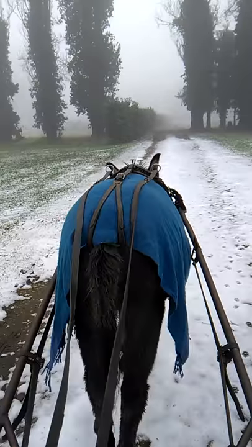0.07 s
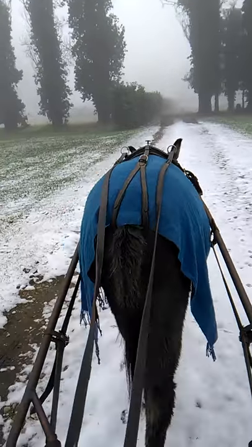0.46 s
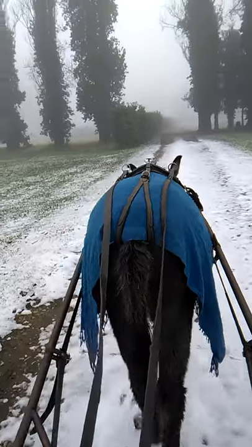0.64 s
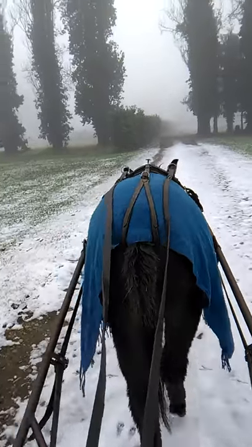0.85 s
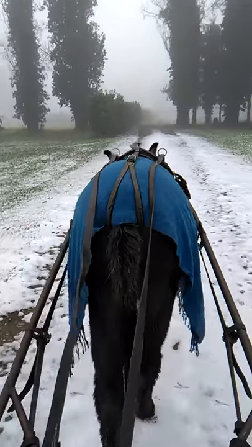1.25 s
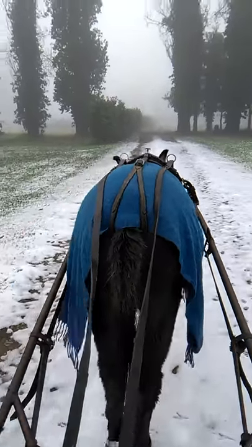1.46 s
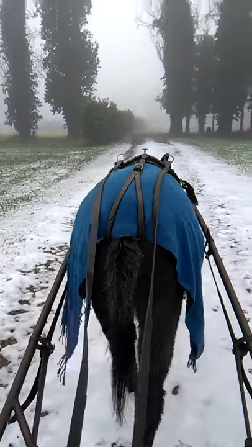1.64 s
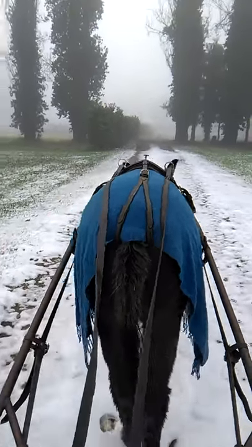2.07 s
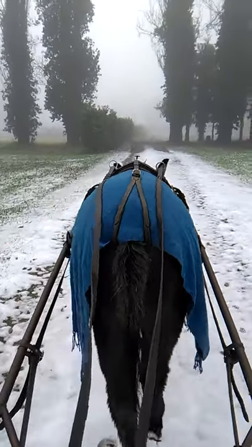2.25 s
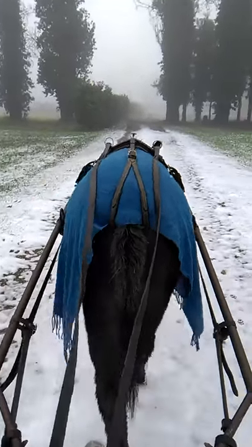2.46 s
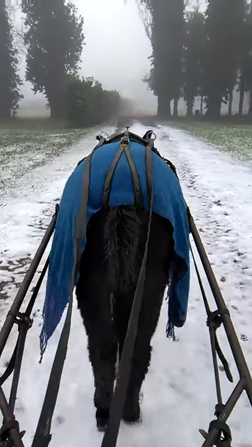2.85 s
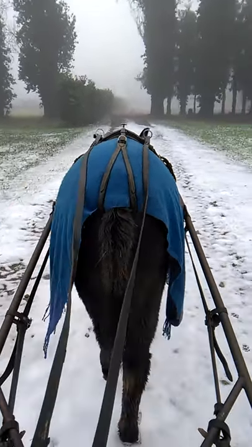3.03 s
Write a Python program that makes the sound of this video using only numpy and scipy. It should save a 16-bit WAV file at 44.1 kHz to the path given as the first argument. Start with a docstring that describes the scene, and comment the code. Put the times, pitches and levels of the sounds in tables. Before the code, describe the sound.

Cart wheels crunch and rumble along a snowy track, heard close in open air with soft hoof scuffs. One sharp drip comes early, followed by hollow bumps and shaft knocks, then quieter rolling with light harness clinks.

```python
"""A horse draws a light cart along a snowy track, heard from the driver's seat.
From 0.2 s the cart rumbles, its wheels crush snow crystals and hooves scuff the surface.
At 0.4 s a drop snaps close by. From 0.85 s the body thuds over bumps, then the shafts knock.
From 1.8 s the roll is softer and a harness buckle clinks five times.
Near 2.75 s the roll dips briefly; one faint knock follows."""
import sys
import numpy as np
from scipy import signal
from scipy.fft import rfft, irfft
from scipy.io import wavfile

SR = 44100
rng = np.random.default_rng(int(sys.argv[2]) if len(sys.argv) > 2 else 0)


def pcm_store(signal):
    """Save signal as 16-bit PCM."""
    levels = np.round(np.clip(np.atleast_2d(signal), -1, 1) * 32767)
    wavfile.write(sys.argv[1], SR, levels.astype(np.int16).T)


N = 136710
TIME = np.arange(N) / SR
EVENT_TIME = TIME[:SR // 6]

# Roll. Each row: time in seconds, rumble in dB, drive of grind and crunch in dB, fizz in dB.
ROLL_LEVELS = [(.2, -51.5, -56, -62.5), (.42, -47.5, -56, -65), (.8, -50.5, -57.5, -66.5),
               (1.0, -44, -56, -67), (1.14, -51.5, -57, -69.5), (1.38, -46.5, -57.5, -70),
               (1.622, -51, -55.5, -68.5), (1.8, -58.5, -63, -64), (1.99, -59, -65.5, -69.5),
               (2.13, -55.5, -62, -63), (2.26, -58, -64.5, -69.5), (2.42, -53, -62.5, -67),
               (2.66, -58, -64.5, -70), (2.72, -69, -70, -75.5), (2.765, -74, -71, -74),
               (2.80, -57.5, -65, -67.5), (3.1, -59.5, -66.5, -71.5)]
# Cart rumble. Each row: frequency in Hz, relative density in dB.
RUMBLE_SPECTRUM = [(22, -45), (48, -10), (67, 0.5), (90, -4), (120, -5), (175, -13.5), (290, -20.5),
                   (450, -26), (2000, -73.5)]
# Packed snow grinding. Each row: frequency in Hz, relative density in dB.
GRIND_SPECTRUM = [(120, -16.5), (290, 2), (510, -5.5), (620, 4), (780, 1), (1000, 1.5), (1400, -9),
                  (2500, -13), (6000, -46.5)]
# Bright wheel crunch. Each row: frequency in Hz, relative density in dB.
CRUNCH_SPECTRUM = [(600, -14.5), (1500, 3), (2400, 2), (4300, -2), (4850, -5.5), (5600, -2.5), (7000, -6),
                   (10000, -20.5), (14500, -30.5)]
# Treble fizz. Each row: frequency in Hz, relative density in dB.
FIZZ_SPECTRUM = [(2000, -41), (5600, -13.5), (7000, -2.5), (8400, 2.5), (10000, -1), (11500, -4),
                 (14500, -10.5)]
# Stereo width of snow. Each row: frequency in Hz, side against middle in dB.
SNOW_WIDTH = [(3000, -78), (4500, -30), (6500, -7), (13000, -5)]

# Hoof scuffs. Each row: start in seconds, length in seconds, hiss in dB, crush in dB.
HOOF_SCUFFS = [(0.307, 0.074, -53.5, -51.5), (0.553, 0.045, -57.5, -65), (1.015, 0.053, -51.5, -54.5),
               (1.259, 0.068, -59.5, -56), (1.556, 0.058, -48.5, -56.5), (1.783, 0.074, -59, -61.5),
               (2.486, 0.057, -54.5, -56.5)]
# Brushed snow, also the buckle's snap. Each row: frequency in Hz, relative density in dB.
HISS_SPECTRUM = [(2000, -18), (5000, -12.5), (7000, -7.5), (9700, -1.5), (11000, -9.5), (14500, -19)]
# Snow crushed under a hoof. Each row: frequency in Hz, relative density in dB.
CRUSH_SPECTRUM = [(250, -6), (800, -8.5), (1800, -0.5), (4500, -4), (7000, -9.5), (12000, -16.5)]

# Knocks. Each row: start in seconds, ring gain in dB, tilt in dB per octave, pitch factor, crack in dB.
SHAFT_KNOCKS = [(.955, -35.5, 0.1, 1, -41.5), (1.3152, -34.5, -2, 0.97, -47), (1.863, -49, -3, 0.95, -58.5),
                (2.505, -43.5, -2.5, 0.99, -50.5), (2.98, -49, -3, 0.96, -63)]
# Shaft resonances. Each row: frequency in Hz, relative level in dB, T60 in seconds.
SHAFT_MODES = [(795, -0.5, 0.038), (963, -4.5, 0.027), (1220, -12.5, 0.071), (1600, -8, 0.016),
               (2176, -17.5, 0.028), (2986, -7, 0.057), (3570, -4, 0.023), (4400, -7, 0.014),
               (5470, -17.5, 0.081), (8620, -14, 0.039)]
# Impact crack. Each row: frequency in Hz, relative density in dB.
CRACK_SPECTRUM = [(400, -4.5), (900, 4.5), (1800, 1), (5800, -2), (14000, -11.5)]

# Thuds, hard ones with a rebound. Each row: start in seconds, gain in dB, pitch factor.
BODY_THUDS = [(0.8514, -36, 0.96), (0.856, -42.5, 1.03), (1.535, -48, 0.71), (2.104, -52, 0.747),
              (2.126, -49.5, .8), (2.149, -50.5, 0.796), (2.3698, -36, 0.99), (2.3741, -43.5, 1.05)]
# Cart body resonances. Each row: frequency in Hz, relative level in dB, T60 in seconds.
BODY_MODES = [(206, -1, 0.027), (333, 0.5, 0.045), (468, -4.5, 0.033), (646, -7, 0.075), (934, -3.5, 0.026),
              (1400, -15, 0.061)]
# Low puff of a thud. Each row: frequency in Hz, relative density in dB.
PUFF_SPECTRUM = [(60, 16), (160, 19), (600, -10), (3000, -32)]

# Ring after the drop. Each row: frequency in Hz, level in dB, T60 in seconds.
DROP_RING_MODES = [(150, -42, .05), (4020, -39.5, .022)]

# Clinks. Each row: start in seconds, gain in dB, tilt in dB per octave, pitch factor.
BUCKLE_CLINKS = [(1.822, -52.5, -3, 1.36), (2.032, -56.5, 1.5, .8), (2.102, -49.5, -6, 1.17),
                 (2.112, -50.5, 1.5, 1), (2.312, -56, -7, 1.4)]
# Buckle resonances. Each row: frequency in Hz, relative level in dB, T60 in seconds.
BUCKLE_MODES = [(2077, -2.5, 0.058), (2300, -3, 0.015), (3370, -9, 0.063), (7850, -3, 0.016),
                (8140, -6, 0.078), (8300, -6, .03)]

MODE_RISE_S, CRACK_RISE_S = .00066, .0005


def wheels(firm_db=-56, lump_db=.5, lump_hz=30, crunch_db_per_db=1.474):
    """The cart rumbles as its wheels crush snow in lumps; crunch eases faster than grind."""
    times_s, *levels_db = np.transpose(ROLL_LEVELS)
    rumble_db, drive_db, fizz_db = (np.interp(TIME, times_s, db) for db in levels_db)
    over_firm_db = drive_db - firm_db + lump_db * wander(lump_hz)
    rumble = unit(colour(rng.standard_normal(N), RUMBLE_SPECTRUM)) * amp(rumble_db)
    grind = snow(GRIND_SPECTRUM, N) * amp(firm_db - 2.5 + over_firm_db)
    crunch = snow(CRUNCH_SPECTRUM, N) * amp(firm_db - 3.5 + crunch_db_per_db * over_firm_db)
    fizz = snow(FIZZ_SPECTRUM, N) * amp(fizz_db)
    return rumble + grind + crunch + fizz


def snow(spectrum, size, grains_per_s=2500, spread_db=2, grain_share=.31):
    """Crystals break: uneven clicks in a hiss, wide only in the treble."""
    shape = (2, size)
    breaks = rng.random(shape) < grains_per_s / SR
    signs = rng.choice([-1, 1], shape)
    grains = unit(breaks * signs * amp(spread_db * np.minimum(rng.exponential(1, shape), 4)))
    texture = np.sqrt(grain_share) * grains + np.sqrt(1 - grain_share) * rng.standard_normal(shape)
    mid, side = colour(clumps(texture), spectrum)
    side = colour(side, SNOW_WIDTH)
    return unit(np.array([mid + side, mid - side]))


def clumps(x, depth_db=2, width_hz=502, length_s=.015):
    """Crystals break in clumps: random patches of time and frequency rise or fall."""
    hz, t, cells = signal.stft(x, SR, nperseg=256, noverlap=192)
    per_hz, per_s = np.fft.fftfreq(len(hz), hz[1])[:, None], np.fft.fftfreq(len(t), t[1])
    blur = np.exp(-2 * np.pi * ((per_hz * width_hz / 2) ** 2 + (per_s * length_s / 2) ** 2))
    patches = unit(np.fft.ifft2(np.fft.fft2(rng.standard_normal(blur.shape)) * blur).real)
    _, clumped = signal.istft(cells * amp(depth_db * patches), SR, nperseg=256, noverlap=192)
    return clumped[:, :x.shape[1]]


def hooves(crush_lag_s=.014, peak_fraction=.35):
    """Each hoof brushes loose snow, then crushes what lies under it."""
    out, t = np.zeros((2, N)), EVENT_TIME
    for start_s, length_s, hiss_db, crush_db in HOOF_SCUFFS:
        pressure = np.interp(t / length_s, [0, peak_fraction, 1], [0, 1, 0]) ** .54
        add(out, start_s, snow(HISS_SPECTRUM, len(t)) * pressure * amp(hiss_db))
        add(out, start_s + crush_lag_s, snow(CRUSH_SPECTRUM, len(t)) * pressure * amp(crush_db))
    return out


def shafts(judder_t60_s=.026):
    """A shaft cracks and scrapes in its fitting; bending waves bring the low modes last."""
    out, t = np.zeros((2, N)), EVENT_TIME
    for start_s, ring_db, tilt_db_per_oct, pitch, crack_db in SHAFT_KNOCKS:
        judder = rng.standard_normal(len(t)) * amp(-60 * t / judder_t60_s)
        contact = (t == 0) + .5 * judder / np.linalg.norm(judder)
        response = ring(SHAFT_MODES, tilt_db_per_oct, pitch, lag_s=.00453)
        add(out, start_s, amp(ring_db) * signal.fftconvolve(contact, response)[:len(t)])
        add(out, start_s, burst(CRACK_SPECTRUM, crack_db, t60_s=.045, rise_s=CRACK_RISE_S))
    return out


def cart_body():
    """Bumps strike the body: a low puff and a short hollow ring."""
    out = np.zeros((2, N))
    for start_s, gain_db, pitch in BODY_THUDS:
        puff = burst(PUFF_SPECTRUM, gain_db - 7, t60_s=.052, rise_s=MODE_RISE_S)
        add(out, start_s, puff + amp(gain_db) * ring(BODY_MODES, pitch=pitch))
    return out


def drop(start_s=.4192, snap_db=-23, rise_s=.0002, t60_s=.006, ring_lag_s=.0018):
    """A drop lands close by: a rising snap with a tick, then a faint ring."""
    out, t = np.zeros((2, N)), TIME[:SR // 20]
    from_hz, to_hz, glide_s = 100, 4600, .0009
    hz = to_hz + (from_hz - to_hz) * np.exp(-t / glide_s)
    envelope = np.minimum(t / rise_s, 1) * amp(snap_db - 60 * t / t60_s)
    add(out, start_s, envelope * np.sin(2 * np.pi * np.cumsum(hz) / SR))
    add(out, start_s, burst(CRACK_SPECTRUM, level_db=-37, t60_s=.007, rise_s=rise_s))
    add(out, start_s + ring_lag_s, ring(DROP_RING_MODES))
    return out


def buckle():
    """Metal harness parts touch: a bright snap and a short ring."""
    out = np.zeros((2, N))
    for start_s, gain_db, tilt_db_per_oct, pitch in BUCKLE_CLINKS:
        snap = burst(HISS_SPECTRUM, gain_db + 2 * tilt_db_per_oct, t60_s=.022, rise_s=CRACK_RISE_S)
        add(out, start_s, snap + amp(gain_db) * ring(BUCKLE_MODES, tilt_db_per_oct, pitch))
    return out


def ring(modes, tilt_db_per_oct=0, pitch=1, lag_s=0):
    """Struck modes decay; the lowest starts lag_s late, higher ones sooner."""
    out, lowest_hz = 0, modes[0][0]
    for hz, db, t60_s in modes:
        age_s = np.maximum(EVENT_TIME - lag_s * lowest_hz / hz, 0)
        attack = np.minimum(age_s / MODE_RISE_S, 1)
        decay = amp(db + tilt_db_per_oct * np.log2(hz / lowest_hz) - 60 * age_s / t60_s)
        detuned_hz = hz * pitch * rng.uniform(.99, 1.01)
        out = out + attack * decay * np.sin(2 * np.pi * detuned_hz * age_s)
    return out


def burst(spectrum, level_db, t60_s, rise_s):
    """Coloured noise: fast rise, exponential decay."""
    t = EVENT_TIME
    noise = unit(colour(rng.standard_normal(len(t)), spectrum))
    return noise * np.minimum(t / rise_s, 1) * amp(level_db - 60 * t / t60_s)


def colour(x, spectrum):
    """Filters by (Hz, dB) points."""
    hz, db = np.transpose(spectrum)
    bins_hz = np.fft.rfftfreq(x.shape[-1], 1 / SR)
    return irfft(rfft(x) * amp(np.interp(np.log(bins_hz + 1), np.log(hz), db)), x.shape[-1])


def wander(rate_hz):
    """Slow random motion, rms one."""
    bins_hz = np.fft.rfftfreq(N, 1 / SR)
    return unit(irfft(rfft(rng.standard_normal(N)) * np.exp(-(bins_hz / rate_hz) ** 2), N))


def amp(db):
    """Decibels to gain."""
    return 10 ** (np.asarray(db) / 20)


def unit(x):
    """Scales to rms one."""
    return x / np.sqrt(np.mean(x ** 2) + 1e-20)


def add(mix, start_s, sound):
    """Mixes a sound in at start_s."""
    part = mix[:, max(round(start_s * SR), 0):][:, :sound.shape[-1]]
    part += sound[..., :part.shape[1]]


def scene():
    """All sources in open air, no echo."""
    return wheels() + hooves() + shafts() + cart_body() + buckle() + drop()


def record(dry):
    """Silence, a quick fade-in, then a low-pass."""
    start_s, fade_s, cutoff_hz = .192, .004, 14350
    faded = dry * np.clip((TIME - start_s) / fade_s, 0, 1)
    lowpass = signal.firwin(511, cutoff_hz, window=("kaiser", 9), fs=SR)
    return signal.oaconvolve(faded, lowpass[None], "same")


dry = scene()
out = record(dry)
pcm_store(out)
```